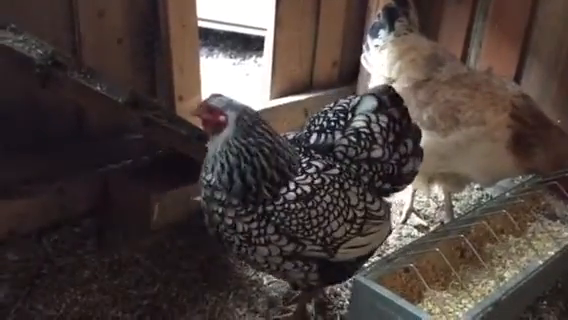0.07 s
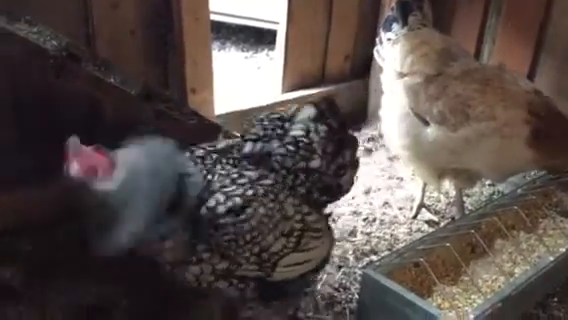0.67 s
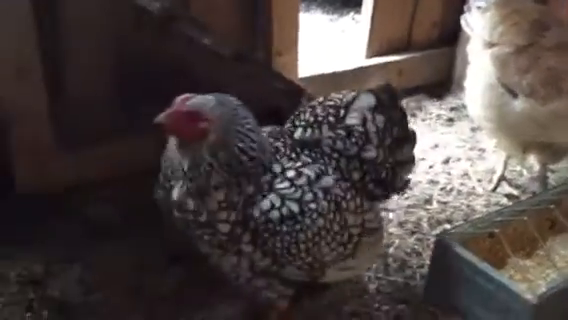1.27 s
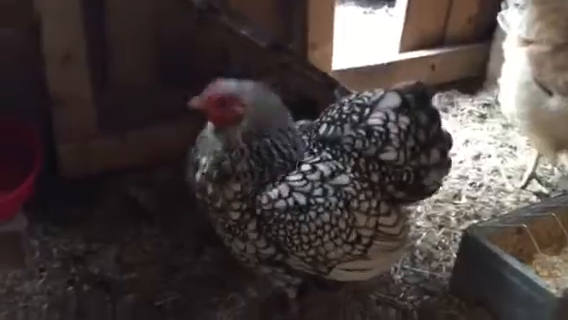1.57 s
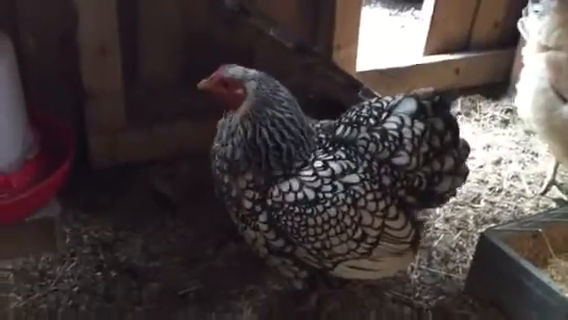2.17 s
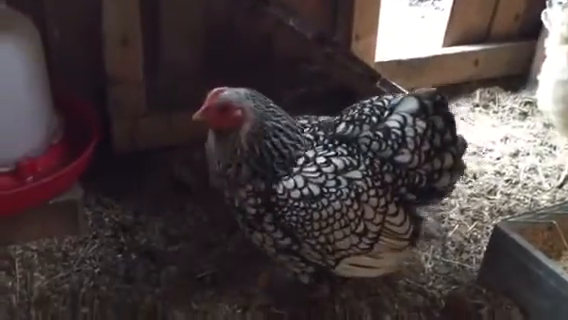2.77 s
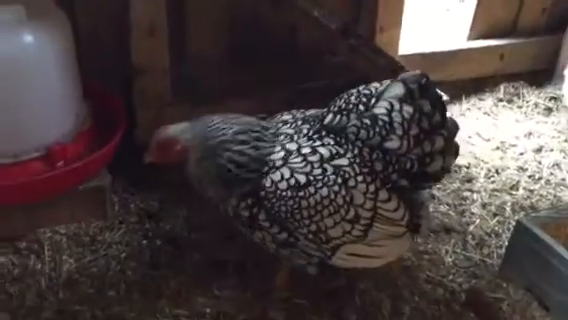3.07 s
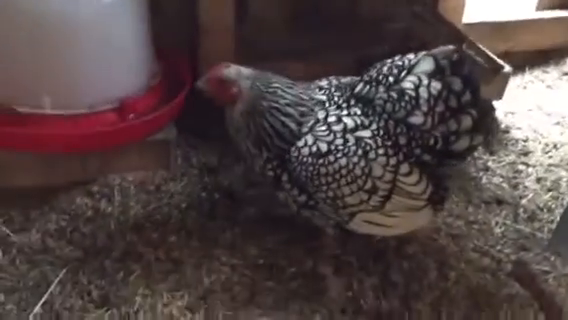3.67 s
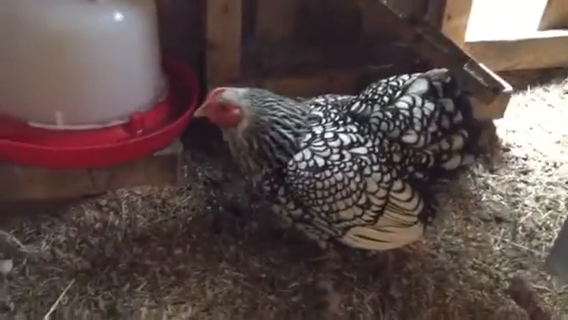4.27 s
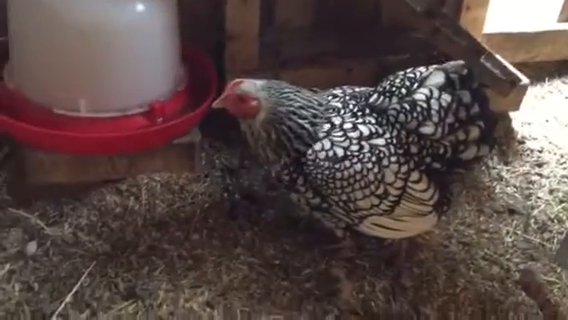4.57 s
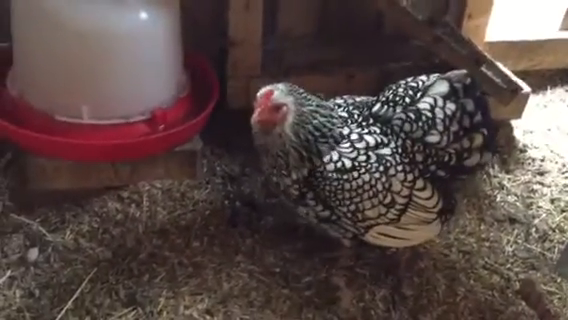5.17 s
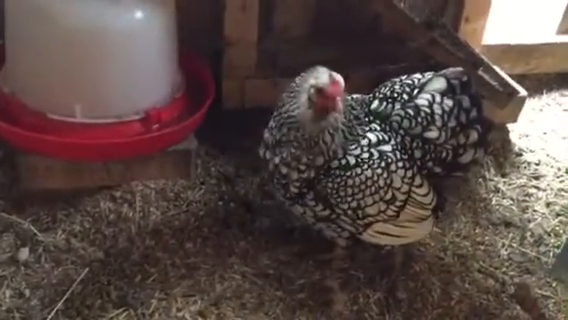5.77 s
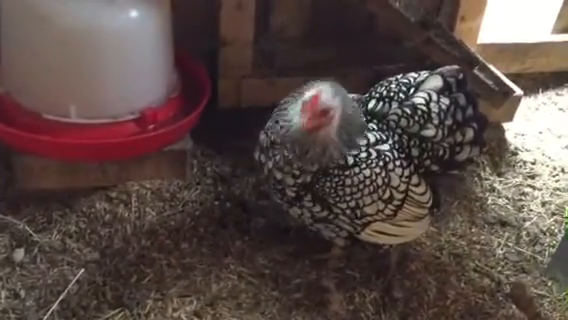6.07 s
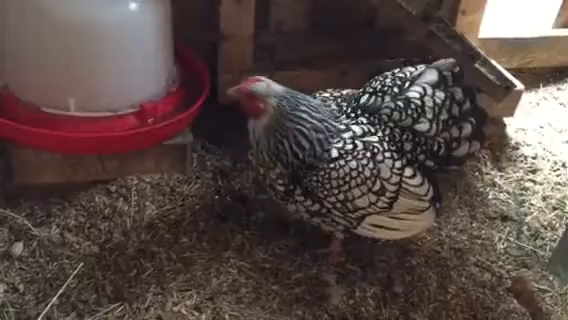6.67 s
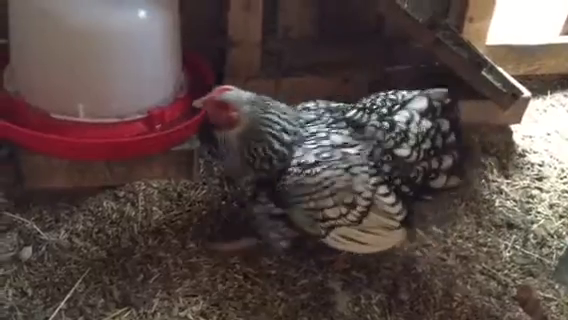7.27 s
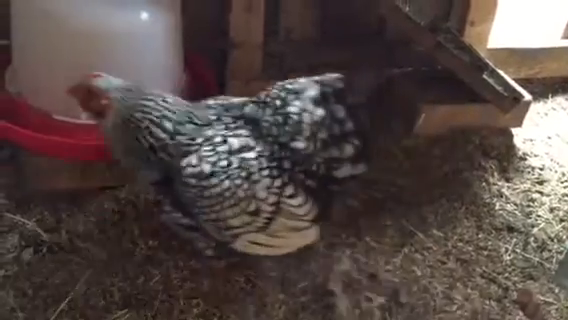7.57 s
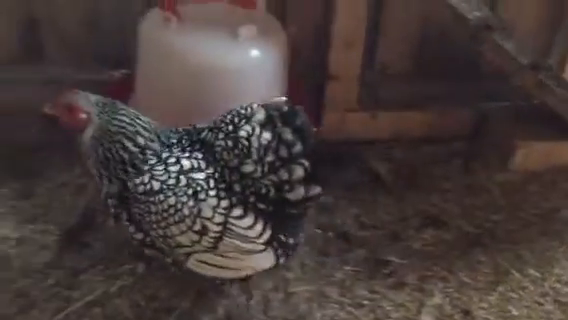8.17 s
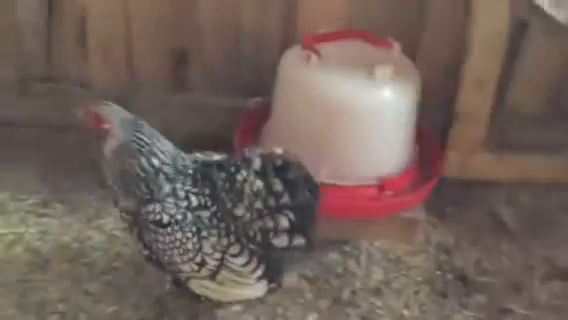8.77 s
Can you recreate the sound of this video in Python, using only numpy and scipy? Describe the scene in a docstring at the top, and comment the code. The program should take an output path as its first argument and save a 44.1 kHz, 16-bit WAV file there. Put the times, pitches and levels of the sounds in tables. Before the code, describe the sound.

A hen clucks softly and close by in a small wooden coop with a very short, boxy echo. Her clucks are brief single notes, unevenly spaced, pausing between about 1 and 2.2 seconds and coming more often around 2.5 to 3 seconds and after 6.4. Three times she breaks into a louder, short, hoarse squawk that jumps up in pitch and sags: at about 0.7, 3.2 and 7.5 seconds. Straw rustles and crackles faintly under her feet, with the sharpest snap at 3.3 seconds and a smaller one near 8. One dry click sounds at 6 seconds. Outside, a distant engine rumbles quietly throughout, growing around 4 and 8 seconds, in a thin wash of air with faint wavering tones. A deep, soft flutter rises after 5 seconds, peaks near 6 and eases. The clucking continues until the end at 9 seconds.

```python
"""A hen clucks softly in a small wooden coop and three times breaks into a short hoarse squawk.
Her syrinx chops the breath into pulses, which throat, windpipe and beak filter; the boards reflect them.
Straw snaps and rustles under her feet as its fibres break, and there is one dry click.
Outside, a distant engine rumbles and slowly grows in a thin wash of air with faint wavering tones,
while a deep, soft flutter swells and fades."""
import sys
import numpy as np
from scipy import signal
from scipy.fft import rfft, irfft
from scipy.io import wavfile
from scipy.ndimage import uniform_filter1d, map_coordinates

SR = 44100
rng = np.random.default_rng(int(sys.argv[2]) if len(sys.argv) > 2 else 0)


def file_out(sig):
    """Save sig as 16-bit WAV at sys.argv[1]."""
    # one column per channel
    cols = np.atleast_2d(sig).T
    # limit, then scale
    lim = np.clip(cols, -1, 1)
    pcm = np.round(lim * 32767).astype(np.int16)
    wavfile.write(sys.argv[1], SR, pcm)


N = 397782
TIME = np.arange(N) / SR

# Levels in the tables are relative; each source applies its own gain.
# partials of the engine's drone: (frequency [Hz], level [dB])
DRONE_PARTIALS = [(48.4, -54.5), (96.6, -53), (135.5, -49.5), (259, -66.5)]
# noise spectra of the engine, the outdoor air and the low flutter: (frequency [Hz], density [dB])
RUMBLE_SPECTRUM = [(13, -29), (22, -14), (32, -46), (48, 0.5), (107, -2), (135, -5), (162, -7.5),
                   (186, -7.5), (221, -21), (260, -20.5), (301, -34), (353, -20), (420, -37.5), (550, -85),
                   (920, -120)]
AIR_SPECTRUM = [(150, -24.5), (270, 13), (335, -5), (370, 3.5), (520, 1.5), (770, -2.5), (960, -2),
                (1150, -5), (1630, -10.5), (2600, -18), (2900, -23), (4300, -24.5), (5000, -27),
                (10000, -30.5), (15000, -38)]
LOW_FLUTTER_SPECTRUM = [(22, -23), (32, -9.5), (42, 16), (60, 17), (85, -15.5), (160, -54)]
# faint tones in the air: (frequency [Hz], width [Hz], level [dB])
AIR_TONES = [(236, 8, -10), (275, 9, -5.5), (976, 90, -10.5)]
# envelopes of the engine, the air, its tones and the low flutter: (time [s], level [dB])
ENGINE_SWELL = [(0, -8), (1.7, -0.5), (3, -1), (4, 3.5), (5.5, 1.5), (7, 0.5), (8, 5.5), (9, 3.5)]
AIR_SWELL = [(0, -59), (2.1, -63.5), (3.5, -58), (7.2, -59), (8.2, -58), (9, -58.5)]
TONE_SWELL = [(0, -6), (4, -4), (5, 5), (9, 4)]
LOW_FLUTTER_SWELL = [(0, -44.5), (4.9, -56.5), (5.25, -45.5), (6.1, -38), (6.6, -44), (9, -45)]

# early reflections off the floor and nearest boards: (delay [s], level [dB])
BOARD_ECHOES = [(.0036, -23), (.0071, -20), (.0118, -15), (.0175, -14.5), (.0295, -19.5)]
# reverberation of the coop: (frequency [Hz], time to fall 60 dB [s])
COOP_DECAY = [(200, 0.25), (800, 0.14), (1600, 0.18), (4000, 0.069), (12000, 0.11)]

# stalks breaking underfoot: (time [s], snap level [dB], crunch level [dB], crispness [0-1])
STALK_BREAKS = [(0.292, -37.5, -60, .8), (1.114, -53, -59, 0), (1.163, -51, -55, 0.66),
                (1.579, -46, -51.5, 0.76), (1.631, -48, -67, .9), (2.953, -56, -59, 0.24),
                (3.309, -28.5, -40, .66), (3.323, -31, -44, 0.9), (3.671, -52, -61, 0),
                (3.731, -60, -68, 0), (3.93, -43.5, -70, 0.86), (4.641, -53, -61, 0.46),
                (5.077, -52, -73, .9), (5.161, -49.5, -78, 1), (5.284, -67, -62, 0.5), (7.322, -45, -65, 1),
                (7.973, -40, -52, 0.86), (8.786, -60, -54, 0.7)]
# stirring of the litter by feet and feathers: (time [s], level [dB])
LITTER_SWELL = [(0, -76), (.6, -77), (.8, -55), (.95, -67.5), (1.3, -73.5), (2.9, -78.5), (5.2, -79.5),
                (6.1, -87), (7.3, -73.5), (9, -79)]
# spectra of dry stalks and of trodden litter: (frequency [Hz], gain [dB])
STALK_SPECTRUM = [(400, -29), (1500, -20.5), (3500, -4), (6000, -10), (9500, 0), (12000, -8), (15000, -17)]
LITTER_SPECTRUM = [(300, -7), (1200, 14), (2500, 7), (4200, 5.5), (6500, 3), (9500, -1), (15000, 2.5)]

# voice spectra before the resonances, body mainly below 2 kHz, rasp above: (frequency [Hz], gain [dB])
CLUCK_BODY_SPECTRUM = [(180, -50.5), (340, -1.5), (520, 0.5), (750, 2.5), (1100, -2), (1450, -12),
                       (1800, -20.5), (2400, -33.5), (4000, -52)]
CLUCK_RASP_SPECTRUM = [(1300, -31), (2150, 4), (2550, -6), (3000, -12.5), (3600, -5.5), (4600, -5.5),
                       (5300, -14), (6200, -10), (7800, -22), (9300, -15), (10300, -40), (15000, -26)]
SQUAWK_BODY_SPECTRUM = [(180, -29), (380, 5.5), (560, -7.5), (800, 4), (1100, -0.5), (1450, -1.5),
                        (1750, -2), (2050, -15.5), (4000, -33)]
SQUAWK_RASP_SPECTRUM = [(1500, -38.5), (2300, -1), (2850, 0.5), (3250, -5.5), (3800, -1), (4600, -3.5),
                        (5400, -13.5), (7300, -17), (8500, -20.5), (9600, -17.5), (10800, -25),
                        (15000, -30)]
# clucks: (time [s], length [s], push level [dB], lead-in re push [dB], nominal pitch [Hz],
# rasp re body [dB], windpipe resonance spacing [Hz], beak resonance [Hz])
CLUCK_NOTES = [(0.246, 0.028, -30, -3, 356.6, -23.5, 1200, 6300),
               (0.591, 0.028, -30.5, -10.5, 328.7, -25.5, 1310, 2650),
               (2.257, 0.02, -36.5, -1.5, 363, -44, 1490, 6900),
               (2.545, 0.028, -25, -7, 362.3, -23.5, 1160, 2660),
               (2.777, 0.032, -28, -6.5, 341.5, -25.5, 1196, 5100),
               (3.002, 0.030, -28, -5, 346.7, -30.5, 1225, 5200),
               (3.584, 0.031, -29.5, -11, 371.5, -26.5, 1380, 2780),
               (4.031, 0.03, -28.5, -5, 370, -22.5, 1264, 3550),
               (4.921, 0.027, -34.5, -11, 329, -25, 1120, 4830),
               (5.459, 0.027, -26.5, -5, 362.8, -20, 992, 4300),
               (6.378, 0.027, -35, -14, 345, -25.5, 1230, 6800),
               (6.678, 0.026, -24, -8.5, 377.8, -23.5, 1380, 2190),
               (7.010, 0.031, -25.5, -6.5, 363.6, -23.5, 1250, 6650),
               (7.368, 0.0299, -29.5, -11, 347.4, -25.5, 1150, 2580),
               (7.929, 0.032, -33.5, -16, 390.3, -30.5, 1390, 2670),
               (8.135, 0.030, -27, -9, 398, -23, 1454, 5400),
               (8.351, 0.035, -30, -5.5, 369.4, -25, 1143, 5870),
               (8.733, 0.031, -39.5, -11.5, 331, -44, 1490, 2200),
               (8.931, 0.037, -29, -9.5, 368, -17.5, 1070, 5960)]
# the note that opens each squawk: (time [s], effort [dB], pitch [Hz], throat resonance [Hz],
# rasp re body [dB], throat resonance in the following catch [Hz])
SQUAWK_OPENINGS = [(0.696, -19.5, 379.3, 1110, -20, 750), (3.159, -27, 404.4, 900, -19, 1070),
                   (7.471, -28, 423.8, 866, -17, 790)]
# the cry after the break, one curve a squawk: (time [s], effort [dB], pitch [Hz])
CRY_CURVES = [
    [(0.762, -18, 559), (0.775, -19, 550.6), (0.781, -18, 450.7), (0.801, -24.5, 448.7),
     (0.811, -17, 481.7), (0.831, -19.5, 467.6), (0.849, -24, 376), (0.871, -28.5, 371)],
    [(3.220, -21, 557), (3.229, -19.5, 437.4), (3.242, -23.5, 477), (3.254, -22.5, 432.6),
     (3.263, -22, 448.7), (3.274, -21, 512), (3.286, -26.5, 524), (3.292, -22.5, 416)],
    [(7.521, -18, 519), (7.531, -16, 579.6), (7.549, -18, 552.5), (7.559, -20.5, 492), (7.58, -18, 480.6),
     (7.592, -20, 510.6), (7.613, -24.5, 488)],
]
# neck posture in each squawk: (windpipe resonance spacing [Hz], reflection [0-1],
# beak resonance [Hz], beak strength [dB], gain above 5 kHz [dB])
SQUAWK_POSTURES = [(1155, 0.28, 2200, -6.5, -1), (1264, 0.13, 3640, 11, 1), (1450, 0.3, 2800, -9, -0.5)]

THROAT_HZ, ORDINARY_DB, THROAT_HZ_PER_DB = 867, -26, 19  # a harder cluck opens the throat wider
OPENING_RISE_S, OPENING_RISE_DB, OPENING_HOLD_S = 0.0061, 8.5, 0.021
CATCH_DB, CATCH_RASP_DB, BREAK_S = -29, -15.5, 0.00524
CRY_RASP_DB, RASP_FADE_DB_PER_S = -12.5, 70


def gain_of(db):
    """Amplitude ratio of a level in decibels."""
    return 10 ** (np.asarray(db) / 20)


def unit_rms(x):
    """Normalisation to an rms of one."""
    return x / np.sqrt(np.mean(x ** 2) + 1e-20)


def steadied(x, size=400):
    """Division by the short-time rms flattens the envelope, so that effort sets the loudness."""
    power = uniform_filter1d(uniform_filter1d(x ** 2, size), size // 2)
    return x / np.sqrt(abs(power) + 1e-12)


def value_at(points, hz):
    """Interpolation of a table on a log-frequency axis."""
    f, value = np.transpose(points)
    return np.interp(np.log(hz + 1), np.log(f), value)


def swell(points):
    """Amplitude envelope through points of (time [s], level [dB])."""
    return gain_of(np.interp(TIME, *np.transpose(points)))


def add(mix, s, sound):
    """Superposition of a sound on the mix at time s."""
    part = mix[max(round(s * SR), 0):][:len(sound)]
    part += sound[:len(part)]


def wander(count, hz):
    """Smooth random modulation, of rms near one, that changes about hz times a second."""
    knots = rng.standard_normal(count // 16 + 8)
    return map_coordinates(knots, [np.arange(count) * hz / SR], order=2, mode="mirror")


def noise(spectrum):
    """Spectral shaping of white noise, at an rms of one."""
    gain = gain_of(value_at(spectrum, np.fft.rfftfreq(N, 1 / SR)))
    return unit_rms(irfft(rfft(rng.standard_normal(N)) * gain, N))


def colour(x, spectrum, size=4096):
    """A minimum-phase filter is causal: it rings only after it is excited."""
    log_gain = np.log(gain_of(value_at(spectrum, abs(np.fft.fftfreq(size, 1 / SR)))))
    ring = np.fft.ifft(np.exp(np.conj(signal.hilbert(log_gain)))).real[:size // 2]
    return signal.oaconvolve(x, ring)[:len(x)]


def engine():
    """Level rises with nearness: wavering partials swell fully, the broadband rumble by less."""
    drone = np.zeros(N)
    for hz, db in DRONE_PARTIALS:
        amplitude = np.sqrt(2) * gain_of(db + 2 * wander(N, 3.5))
        turns = np.cumsum(hz + 1.572 * wander(N, 6)) / SR
        drone += amplitude * np.sin(2 * np.pi * turns)
    nearness = swell(ENGINE_SWELL)
    return nearness * drone + gain_of(-43.5) * nearness ** 0.56 * noise(RUMBLE_SPECTRUM)


def outdoor_air():
    """Random modulation spreads faint tones into narrow bands within a wash of noise."""
    tones = np.zeros(N)
    for hz, width, db in AIR_TONES:
        amplitude = gain_of(db) * wander(N, width)
        turns = np.cumsum(hz * (1 + .03 * wander(N, 3))) / SR
        tones += amplitude * np.sin(2 * np.pi * turns)
    wash = noise(AIR_SPECTRUM) * gain_of(-0.5 + 1.37 * wander(N, 7))
    return swell(AIR_SWELL) * (wash + swell(TONE_SWELL) * tones)


def low_flutter():
    """Narrow-band noise fluctuates in amplitude: a deep, soft flutter that swells and fades."""
    return swell(LOW_FLUTTER_SWELL) * noise(LOW_FLUTTER_SPECTRUM)


def click(at_s=6.0208, level_db=-29.5, decay_s=0.0041):
    """A lone dry click: a sudden step that dies away quickly by exponential decay."""
    out, t = np.zeros(N), np.arange(SR // 20) / SR
    add(out, at_s, -gain_of(level_db) * np.exp(-t / decay_s))
    return out


def coop(x, tail_db, size=16384):
    """Convolution with the room response: direct sound, early reflections and a short dense tail."""
    taps = rng.choice([-1., 1.], size) * (rng.random(size) < 3000 / SR)  # 3000 reflections a second
    taps *= np.arange(size) > .006 * SR
    hz, t, bands = signal.stft(taps, SR, nperseg=256)
    decay = gain_of(-60 * t / value_at(COOP_DECAY, hz)[:, None])
    tail = signal.istft(bands * decay, SR, nperseg=256)[1]
    response = gain_of(tail_db) * tail / np.linalg.norm(tail)
    response[0] += 1
    for delay, db in BOARD_ECHOES:
        response[round(delay * SR)] += gain_of(db)
    return signal.oaconvolve(x, response)[:N]


def crackle(count, per_s, spread_db):
    """Fibres break as a Poisson process: many tiny impulses and a few large ones."""
    sizes = gain_of(spread_db * np.minimum(rng.exponential(1, count), 4))
    return unit_rms(sizes * rng.standard_normal(count) * (rng.random(count) < per_s / SR))


def straw(snap_t60_s=0.028, small_count=7, small_snap_db=-66, small_crunch_db=-68):
    """Fracture: a stalk snaps, then the litter crunches and settles, duller than the dry stalks."""
    crisp, dull, t = np.zeros(N), np.zeros(N), np.arange(SR // 2) / SR
    fibres = crackle(N, per_s=2500, spread_db=3.5)
    rustle = unit_rms(colour(fibres, LITTER_SPECTRUM)) * gain_of(2 * wander(N, 18))
    small_breaks = [(when * N / SR, small_snap_db, small_crunch_db, crispness)
                    for when, crispness in rng.random((small_count, 2))]
    for s, snap_db, crunch_db, crispness in STALK_BREAKS + small_breaks:
        crunch_t60_s = 0.16 * 2 ** ((crunch_db + 61.5) / 24.5)  # a heavier crunch lasts longer
        snap = gain_of(snap_db - 60 * t / snap_t60_s) * rng.standard_normal(len(t))
        crunch = gain_of(crunch_db - 60 * t / crunch_t60_s) * crackle(len(t), per_s=5000, spread_db=2.5)
        add(crisp, s, crispness * (snap + crunch))
        add(dull, s, (1 - crispness) * (snap + crunch))
    breaks = colour(crisp, STALK_SPECTRUM) + gain_of(-4.5) * colour(dull, LITTER_SPECTRUM)
    return breaks + swell(LITTER_SWELL) * rustle


def thinned(body, s, db_per_octave_per_s=.55, pivot_hz=800, halfway_s=4.04):
    """Spectral tilt about a pivot: the farther she has walked, the less bass and the more edge."""
    tilt_db = db_per_octave_per_s * (s - halfway_s)
    return [(hz, db + tilt_db * np.clip(np.log2(hz / pivot_hz), -1, 1)) for hz, db in body]


def throat(x, hz, width_hz):
    """A formant: a resonance of unit gain whose centre follows the curve hz."""
    carrier = np.exp(2j * np.pi * np.cumsum(hz) / SR)
    pole = np.exp(-np.pi * width_hz / SR)
    return 2 * (carrier * signal.lfilter([1 - pole], [1, -pole], x / carrier)).real


def neck(x, pipe_hz, reflection, beak_hz, beak_db, top_db=0, beak_width_hz=340):
    """Standing waves in the windpipe form a comb; the beak favours one band, feathers shade the top."""
    hz = np.fft.rfftfreq(2 * len(x), 1 / SR)
    pipe = 1 / (1 - reflection * np.exp(-2j * np.pi * hz / pipe_hz))
    beak = 1 + gain_of(beak_db) / (1 + 2j * (hz - beak_hz) / beak_width_hz)
    shade = gain_of(np.interp(hz, [4000, 5500], [0, top_db]))
    return irfft(rfft(x, 2 * len(x)) * pipe * beak * shade)[:len(x)]


def voice(t, effort_db, hz, throat_hz, rough, rasp_db, posture, body, rasp, width_hz, rise_s, fade_s):
    """Source and filter: each cycle the syrinx slaps shut and passes a puff; throat and neck resonate."""
    count = len(t)
    jitter = (.008 + .075 * rough) * wander(count, 350)
    turns = np.cumsum(hz * (1 + jitter)) / SR
    slaps = unit_rms(sum(np.cos(2 * np.pi * k * turns) for k in range(1, 40)))
    slaps *= 1 + 1.23 * rough * wander(count, 396.9)  # a hoarse voice has uneven cycles
    airflow = 0.15 + np.exp(-(turns % 1) / 0.53)
    puffs = unit_rms(airflow * rng.standard_normal(count))
    low = throat(colour((1 - rough) * slaps + rough * puffs, body), throat_hz, width_hz)
    airy = .14 + .45 * rough
    high = neck(colour((1 - airy) * slaps + airy * puffs, rasp), *posture)
    gate = np.clip((t - t[0]) / rise_s, 0, 1) * np.clip((t[-1] - t) / fade_s, 0, 1)
    return gate * gain_of(effort_db) * (steadied(low) + gain_of(rasp_db) * steadied(high))


def clucks(push_share=0.545, cut_off_s=0.0038, reflection=0.4, beak_db=4.9):
    """Voiced transients: each swells to a pop, its pitch arching and dropping as the syrinx closes."""
    out = np.zeros(N)
    for s, length, push_db, lead_db, nominal_hz, rasp_db, pipe_hz, beak_hz in CLUCK_NOTES:
        t = np.arange(0, length + cut_off_s, 1 / SR)
        push = push_share * length
        crest = (push + length) / 2
        effort_db = push_db + np.interp(t, [0, push / 2, 0.91 * push, push, length],
                                        [lead_db - 5.5, lead_db, lead_db, -4, 2])
        hz = nominal_hz * np.interp(t, [0, push, length], [1.05, 1.1, .94])
        throat_hz = THROAT_HZ + THROAT_HZ_PER_DB * (push_db - ORDINARY_DB)
        throat_hz *= np.interp(t, [0, push, length], [1.06, 1.1, .9])  # the beak closes at the end
        rough = np.interp(t, [0, push], [0.33, 0.36])
        edge_db = rasp_db + np.interp(t, [0, crest, length], [-2, 1.5, -2.5])
        posture = (pipe_hz, reflection, beak_hz, beak_db)
        cluck = voice(t, effort_db, hz, throat_hz, rough, edge_db, posture,
                      thinned(CLUCK_BODY_SPECTRUM, s), CLUCK_RASP_SPECTRUM,
                      width_hz=573, rise_s=0.0041, fade_s=0.0036)
        add(out, s - .001, cluck)
    return out


def squawks():
    """A register break: a cluck-like note catches, then leaps into a cry that sags and turns hoarse."""
    out = np.zeros(N)
    for opening, cry, posture in zip(SQUAWK_OPENINGS, CRY_CURVES, SQUAWK_POSTURES):
        start, open_db, open_hz, open_throat_hz, open_rasp_db, catch_throat_hz = opening
        cry_s, cry_db, cry_hz = np.transpose(cry)
        broken, end = cry_s[0], cry_s[-1]
        held, breaking = start + OPENING_HOLD_S, broken - BREAK_S
        caught = (held + breaking) / 2
        t = np.arange(start - .001, end + 0.0045, 1 / SR)
        effort_db = np.interp(t, [start, start + OPENING_RISE_S, held, caught, breaking, *cry_s],
                              [open_db - OPENING_RISE_DB, open_db, open_db, CATCH_DB, CATCH_DB, *cry_db])
        slack_hz = 0.93 * open_hz
        hz = np.interp(t, [start, held, caught, breaking, *cry_s],
                       [slack_hz, open_hz, slack_hz, slack_hz, *cry_hz])
        cry_throat_hz = np.maximum(2.09 * cry_hz, 950)  # the formant rides above the second harmonic
        throat_hz = np.interp(t, [held, caught, breaking, *cry_s],
                              [open_throat_hz, catch_throat_hz, catch_throat_hz, *cry_throat_hz])
        rough = np.interp(t, [held, caught, broken, end], [0.23, .5, 0.23, .38])
        rasp_db = np.interp(t, [held, caught, breaking, broken],
                            [open_rasp_db, CATCH_RASP_DB, CATCH_RASP_DB, CRY_RASP_DB])
        rasp_db -= RASP_FADE_DB_PER_S * np.maximum(t - broken, 0)
        squawk = voice(t, effort_db, hz, throat_hz, rough, rasp_db, posture,
                       thinned(SQUAWK_BODY_SPECTRUM, start), SQUAWK_RASP_SPECTRUM,
                       width_hz=327, rise_s=0.0022, fade_s=0.0049)
        add(out, t[0], squawk)
    return out


def scene():
    """Superposition: hen and straw reverberate in the coop, and the background adds directly."""
    hen = gain_of(1.38) * clucks() + gain_of(-0.3) * squawks()
    inside = coop(hen + straw(), tail_db=-9)
    return (inside + engine() + outdoor_air() + low_flutter() + click())[None]


def record(dry):
    """Band limiting: a linear-phase low-pass filter cuts off at 15.5 kHz."""
    low_pass = signal.firwin(511, 15500, window=("kaiser", 9), fs=SR)
    return signal.oaconvolve(dry, low_pass[None], "same")


dry = scene()
out = record(dry)
file_out(out)
```